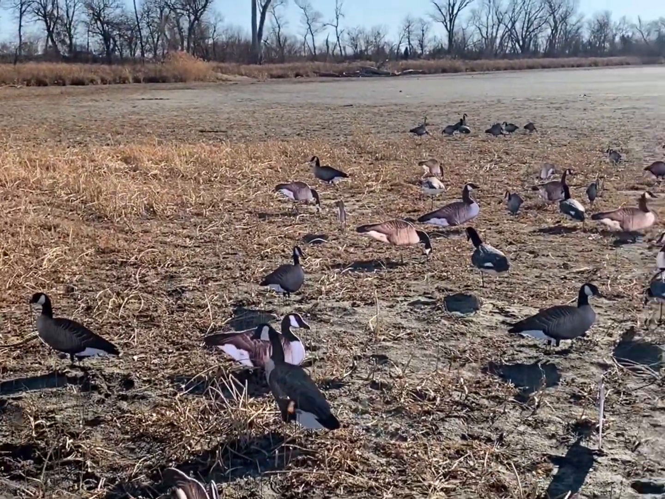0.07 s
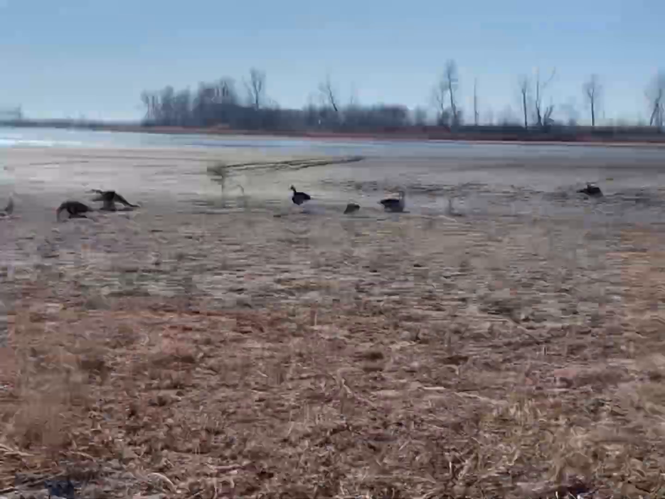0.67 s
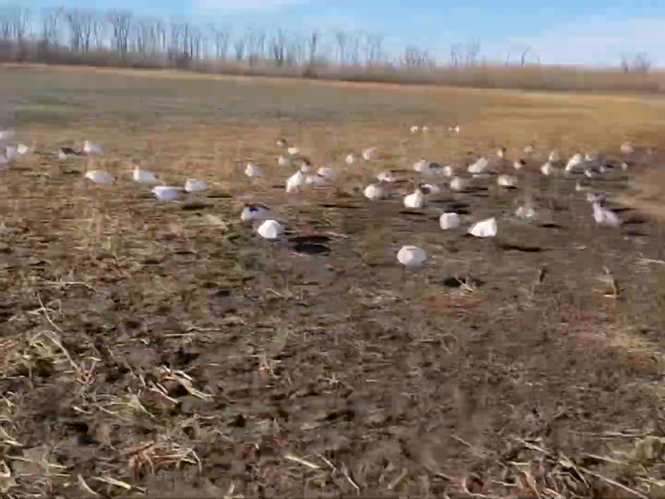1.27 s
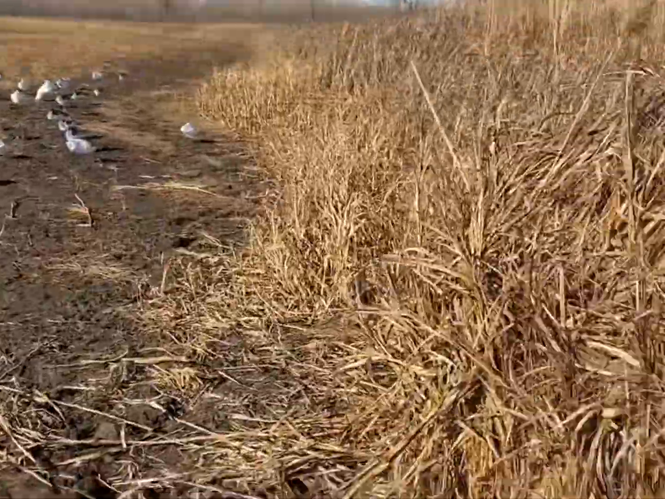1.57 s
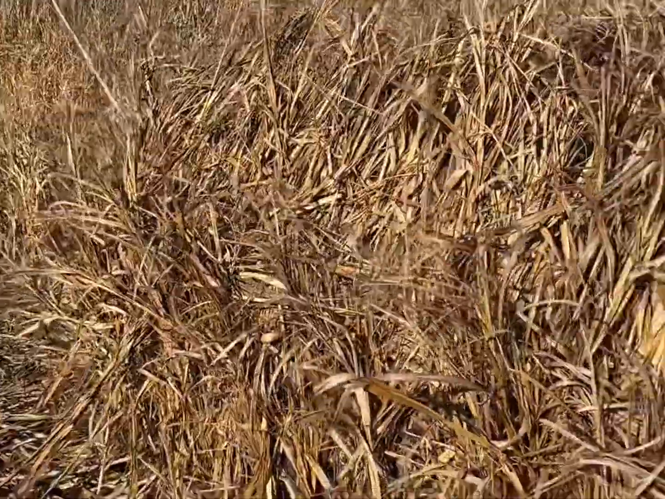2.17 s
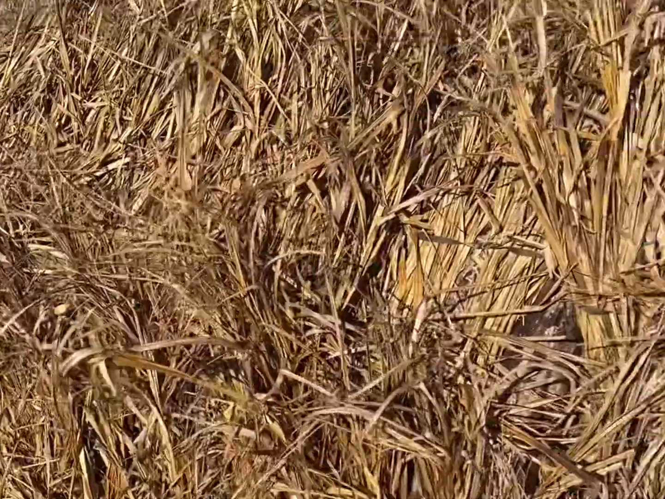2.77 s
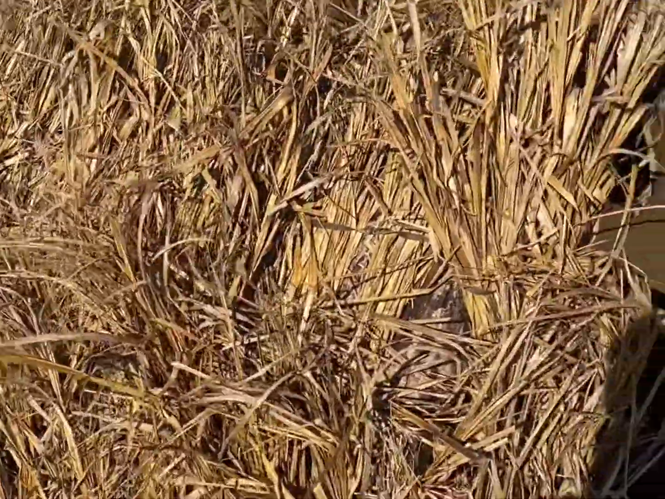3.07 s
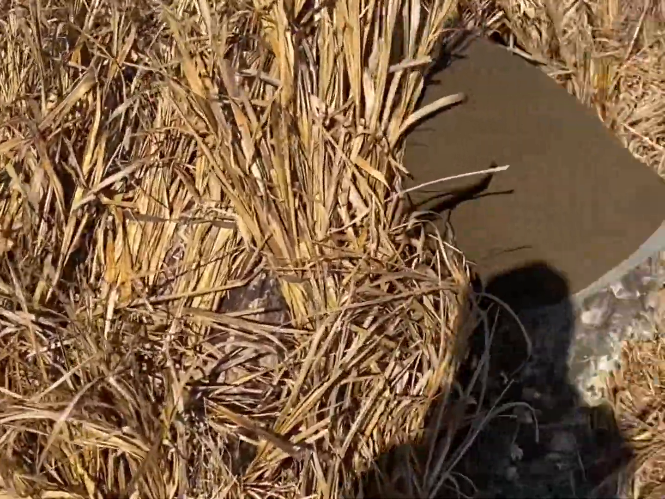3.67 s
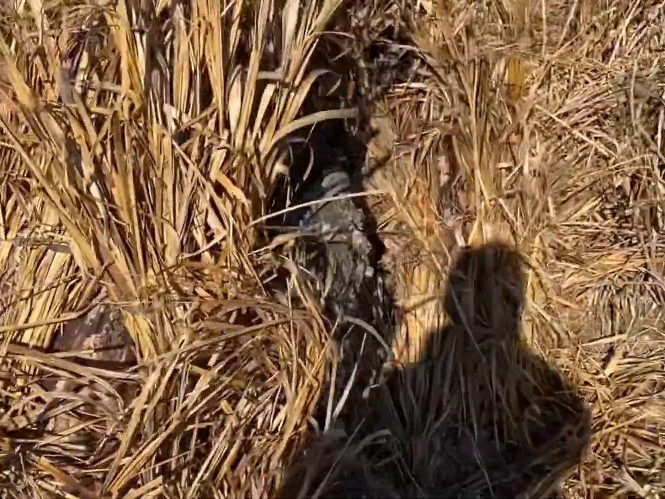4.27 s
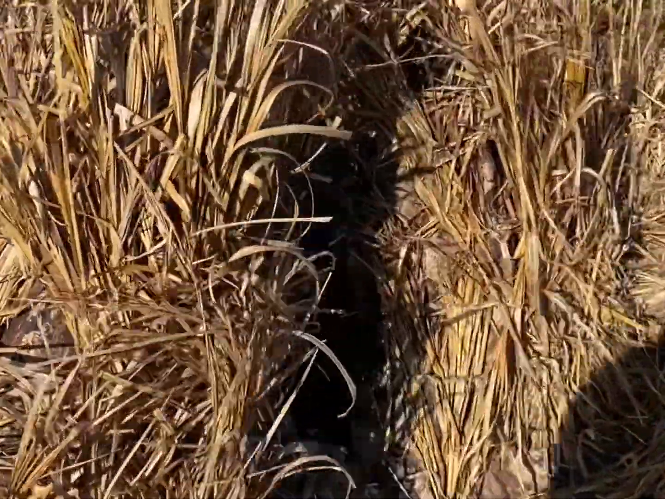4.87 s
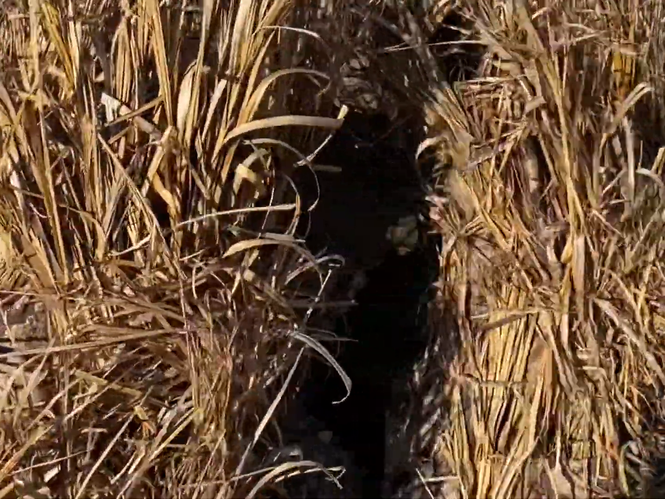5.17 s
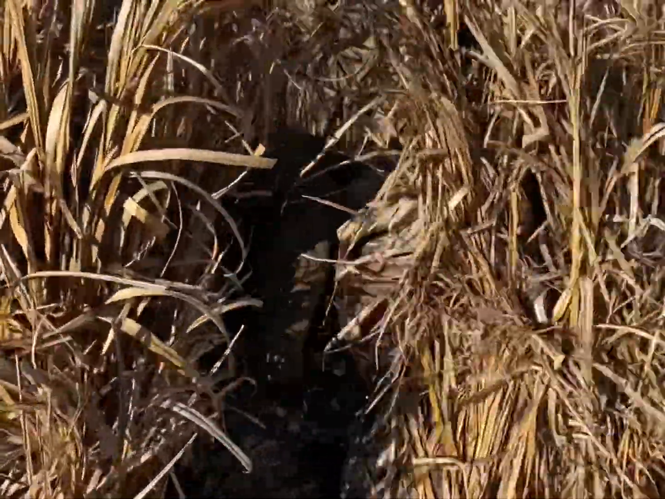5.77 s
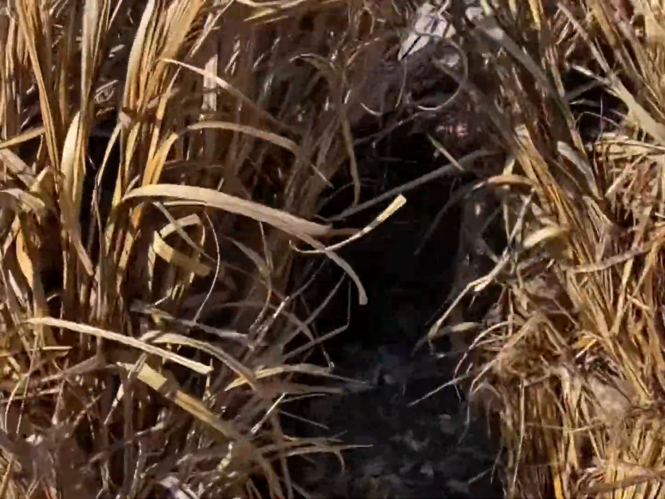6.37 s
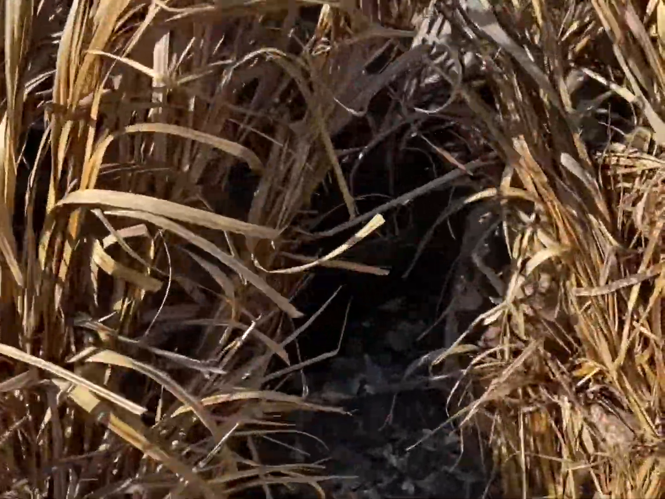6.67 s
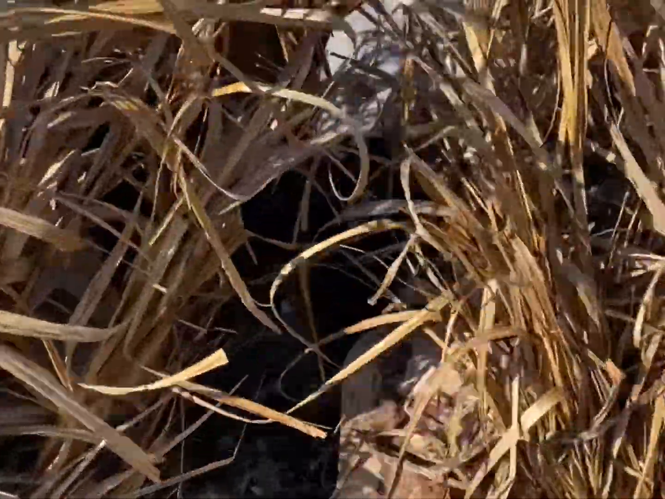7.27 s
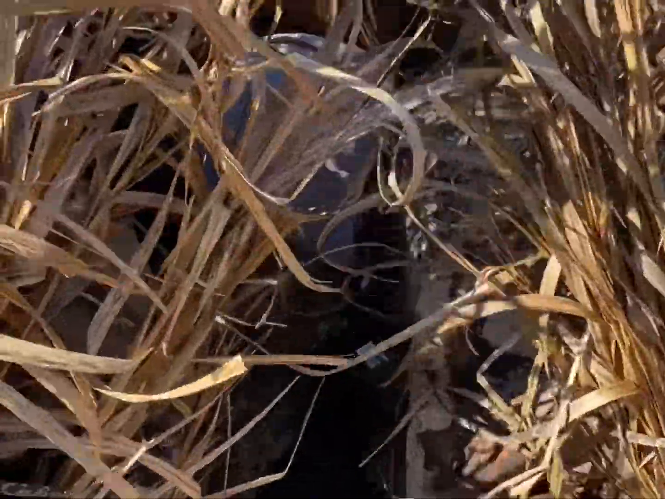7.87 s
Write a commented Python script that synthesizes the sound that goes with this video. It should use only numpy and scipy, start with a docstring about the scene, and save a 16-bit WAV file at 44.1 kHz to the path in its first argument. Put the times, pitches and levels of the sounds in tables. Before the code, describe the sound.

Gusts buffet a hand-held microphone outdoors with an uneven rumble and short, dull thumps. A crisp rustle of dry reeds builds close by, with brushing swishes, occasional snapping stalks and crunches of dead litter. The rustling is strongest a little past the middle, then both wind and reeds settle somewhat, with a soft footfall and light crackling near the end.

```python
"""Low, lumpy wind rumble on a hand-held microphone, carried from open marsh into dry reeds.
Gusts swell and flutter; hard eddies slap the microphone ports and fall into thumps.
The rustle grows as blades tick together and hollow stalks rub. Stalks snap, one woody tap
sounds early on, litter crunches and thuds underfoot. Behind it all, a faint, dull rush."""
import sys
import numpy as np
from scipy import signal
from scipy.fft import rfft, irfft, next_fast_len
from scipy.io import wavfile
from scipy.ndimage import uniform_filter1d

SR = 44100
rng = np.random.default_rng(int(sys.argv[2]) if len(sys.argv) > 2 else 0)


def generate_wav(sig):
    """Save sig (samples, or channels by samples) to the path in sys.argv[1] as 16-bit PCM at SR."""
    pcm = np.round(np.clip(np.atleast_2d(sig).T, -1, 1) * 32767).astype(np.int16)
    wavfile.write(sys.argv[1], SR, pcm)


N = 353241
TIME_S = np.arange(N) / SR
FFT_SIZE = next_fast_len(N + 8192)
FREQS_HZ = np.maximum(np.fft.rfftfreq(FFT_SIZE, 1 / SR), 1)
CUTOFF_HZ = 15900

# Table levels are relative; each source adds its own gain.
# light air between gusts: (time [s], rumble [dB])
BREEZE_CURVE = [(0, -39.5), (0.35, -53.5), (0.65, -45.5), (1.0, -48), (1.4, -59), (1.8, -38.5), (2.2, -58),
                (3.1, -39.5), (3.5, -41), (3.7, -48.5), (4.1, -45.5), (4.68, -37), (4.8, -46), (4.9, -38.5),
                (5.45, -42.5), (5.77, -53.5), (5.9, -46), (6.28, -59), (6.55, -48), (6.9, -50.5),
                (7.6, -54.5), (7.87, -46), (8.0, -60)]
# gusts at the microphone: (peak time [s], length [s], rumble [dB], flutter [dB])
GUST_EVENTS = [(0.154, 0.048, -38, -59), (0.237, 0.098, -40, -52), (0.49, 0.23, -38.5, -49.5),
               (0.831, 0.15, -32.5, -39), (1.068, 0.12, -33, -46), (1.258, 0.061, -37.5, -53.5),
               (1.507, 0.098, -39, -50), (1.648, 0.089, -31, -41.5), (1.805, 0.2, -32.5, -35.5),
               (1.985, 0.079, -30, -40), (2.114, 0.058, -38.5, -49.5), (2.333, 0.078, -28.5, -37),
               (2.45, 0.038, -34.5, -38), (2.623, 0.055, -34, -48.5), (2.87, 0.22, -32.5, -36),
               (3.277, 0.04, -39, -41), (3.378, 0.024, -24, -43), (3.918, 0.087, -33.5, -40.5),
               (4.307, 0.087, -33, -41), (4.495, 0.1, -35, -41), (4.578, 0.22, -37.5, -46.5),
               (4.743, 0.031, -33.5, -39), (5.086, 0.022, -22.5, -44), (5.176, 0.1, -32, -37),
               (5.484, 0.069, -38, -47), (5.582, 0.18, -42.5, -47.5), (5.896, 0.015, -36, -67.5),
               (5.97, 0.047, -35, -53), (6.103, 0.14, -42.5, -72), (6.47, 0.22, -40.5, -45.5),
               (6.728, 0.05, -35.5, -66), (7.103, 0.1, -44, -64)]
# single hard eddies: (time [s], slap [dB], thump [dB])
HARD_EDDIES = [(0.025, -21.5, -33), (0.128, -33.5, -30.5), (0.767, -24, -31), (0.809, -14, -27),
               (0.825, -13, -39), (0.837, -19, -41), (0.849, -15, -47), (0.863, -23.5, -29),
               (0.875, -18.5, -16), (0.885, -18, -26), (0.892, -11.5, -23), (0.904, -23, -21.5),
               (1.083, -24, -26.5), (1.516, -25, -23.5), (1.672, -23.5, -24.5), (1.735, -22.5, -36),
               (1.757, -21, -22), (1.799, -16.5, -20.5), (1.927, -25, -27), (1.956, -25, -43),
               (2.312, -15.5, -20), (2.426, -18, -38), (2.601, -23, -32), (2.773, -22, -17.5),
               (2.878, -16.5, -25.5), (2.89, -16.5, -30.5), (2.932, -18, -26), (2.99, -11, -46),
               (3.093, -23, -34), (3.255, -26, -36), (3.378, -20.5, -28.5), (3.561, -25.5, -29),
               (4.305, -26.5, -33), (4.556, -24, -23), (4.948, -23.5, -30.5), (5.069, -15, -19.5),
               (5.121, -18, -21), (5.177, -21, -29), (5.187, -10, -30), (5.562, -25.5, -40),
               (5.574, -22.5, -26), (6.436, -31, -34), (6.452, -31, -26.5), (6.49, -29.5, -34),
               (6.647, -35.5, -40)]
# steady stir of the reeds: (time [s], rustle [dB])
STIR_CURVE = [(0, -63.5), (0.35, -68.5), (0.6, -64.5), (1.15, -64.5), (1.7, -53), (1.95, -54),
              (2.25, -46.5), (2.6, -43.5), (3.15, -47.5), (3.8, -43), (4.3, -43.5), (4.7, -49),
              (5.15, -40.5), (5.7, -43.5), (5.9, -46), (6.5, -52.5), (6.62, -56), (6.74, -53), (7.1, -50),
              (8.0, -49.5)]
# brushed clumps: (start [s], peak [dB], rise [s], t60 [s])
CLUMP_SWISHES = [(1.49, -48, 0.097, 0.48), (1.991, -38.5, .12, 0.54), (2.229, -40, 0.029, 0.32),
                 (2.7, -41, 0.068, 0.81), (3.88, -42, 0.046, 1), (4.21, -43.5, 0.076, 0.32),
                 (4.762, -42.5, 0.026, 1.4), (5.209, -36, 0.023, 1.25), (5.327, -37.5, 0.049, 2.1),
                 (5.495, -39.5, 0.042, 0.11), (5.968, -41, 0.044, 1.4), (6.744, -41.5, 0.099, 3.1),
                 (7.32, -47.5, 0.085, 1.06), (7.6, -45, 0.091, 0.88)]
# dull low body of the rustle relative to the stalks, briefly ducked by the recorder's
# wind reduction: (time [s], level [dB])
LOW_RUSTLE_CURVE = [(0.5, -7), (1.2, 9), (1.6, -2.5), (2.2, 2), (5.3, 2), (6.3, -2), (6.68, -7.5), (7.3, 2)]
# breaking stalks: (time [s], level [dB], pitch [Hz])
STALK_SNAPS = [(0.221, -55, 5000), (0.401, -45.5, 6000), (0.526, -53, 8000), (0.6728, -53, 8000),
               (0.976, -47, 10000), (1, -48, 9000), (1.017, -49, 9000), (1.729, -45, 8000),
               (1.755, -43, 9000), (2.255, -36, 6000), (3.13, -34, 6000), (3.482, -36, 11000),
               (3.93, -29.5, 9000), (4.231, -32, 9000), (5.5086, -30, 10000), (5.518, -31, 7500),
               (6.5157, -41, 12700), (7.9667, -41.5, 11000)]
# crushed litter, scraped stalks: (time [s], level [dB], pitch [Hz], t60 [s], low edge [Hz])
LITTER_CRUNCHES = [(0.897, -42.5, 2400, 0.28, 655), (3.601, -41, 960, 0.13, 600),
                   (3.882, -32, 9500, 0.041, 3020), (4.011, -33, 9500, 0.13, 1810),
                   (5.309, -34, 2200, 0.11, 910), (5.341, -23.5, 2200, 0.016, 905),
                   (5.3827, -33.5, 2200, 0.032, 700), (5.539, -35, 2340, 0.039, 1510),
                   (6.821, -44.5, 1100, 0.089, 450), (6.885, -55, 2050, .3, 1610),
                   (6.931, -38, 2700, 0.09, 1620), (6.949, -32.5, 2270, 0.023, 1650),
                   (7.102, -42.5, 1490, 0.054, 600)]
# steps on matted reeds: (time [s], level [dB])
SOFT_STEPS = [(3.595, -50), (6.814, -43.5)]
# wind spectra: (frequency [Hz], level [dB])
RUMBLE_SPECTRUM = [(22, -19), (34, -16.5), (50, -1), (75, 1.5), (110, -5), (170, -11), (260, -17),
                   (420, -43)]
FLUTTER_SPECTRUM = [(130, -15), (220, 4.5), (320, 6), (480, 0), (700, -10), (900, -41.5), (1400, -45)]
SPIT_SPECTRUM = [(230, -11.5), (420, 17.5), (700, 1.5), (1100, -17.5), (1500, -17.5), (2200, -46)]
# reed spectra: (frequency [Hz], level [dB])
BLADE_SPECTRUM = [(2000, -40), (3200, -12.5), (4300, -7), (5000, -2), (6500, -4), (9000, -1), (10200, -6),
                  (12500, -5), (14500, -6.5), (18000, -17)]
STALK_SPECTRUM = [(1100, -10.5), (1500, -3), (1900, 0), (2400, 2), (3000, -3), (4200, -4), (6000, -25)]
LOW_RUSTLE_SPECTRUM = [(220, -7), (550, 1), (1000, 1.5), (1400, -3), (2000, -22)]
SNAP_SPECTRUM = [(600, -15), (2000, 3.5), (9000, 11.5), (18000, 3)]
# left port ahead of the right: (frequency [Hz], phase [rad])
LEFT_PHASE_LEAD = [(0, 0.1), (780, -0.1), (1210, 0.97), (1720, 0.5), (2240, 0.75), (3530, 0.4),
                   (4130, 0.75), (5080, -0.1), (6370, 1.85), (6980, 2.92), (8300, 3.8), (9470, 5.3),
                   (9800, 6.1), (10900, 6.3), (11800, 7.4), (13000, 9), (14400, 9.2), (15600, 12.1)]
# diffuse sound at the ports: (frequency [Hz], share [0-1])
DIFFUSE_SHARE = [(500, 0.0067), (1000, 0.31), (1800, 0.12), (3000, 0.35), (4700, 0.11), (6000, 0.006),
                 (7300, 0.00047), (9000, 0.033), (10400, 0.038), (12000, 0.13), (13500, 0.034),
                 (15500, 0.19)]


def wind(rumble_gain_db=3.5, flutter_gain_db=2.0, spit_gain_db=-23.0, rough_above_db=-50.5):
    """Lumpy turbulence: light air flutters smoothly, stronger flow breaks into brighter puffs."""
    rumble_db, flutter_db = airflow_db()
    lumps = from_db(4.5 * drift(40.0))
    eddies = grains(150, spread_db=4.5)[0]
    puffs = rms_one(lumps * (eddies + 0.4 * rng.standard_normal(N)))
    roughness = 1 / (1 + from_db(2 * (rough_above_db - flutter_db)))
    force = from_db(0.5 * (flutter_db - flutter_db.max()))
    rumble = colour(puffs + lumps * rng.standard_normal(N), RUMBLE_SPECTRUM)
    smooth_flow = 0.27 * (1 - roughness) * rng.standard_normal(N)
    flutter = colour(roughness * puffs + smooth_flow, FLUTTER_SPECTRUM)
    spit = from_db(spit_gain_db) * force * colour(puffs * rng.standard_normal(N), SPIT_SPECTRUM)
    return (from_db(rumble_db + rumble_gain_db) * steady(swoop(rumble), span_s=0.067)
            + from_db(flutter_db + flutter_gain_db) * steady(swoop(flutter + spit), span_s=0.11))


def airflow_db(typical_breeze_db=-46.5, typical_flutter_db=-54, flutter_lead_s=0.011):
    """Rumble and flutter levels: gusts on a wavering breeze, small eddies just ahead."""
    breeze_db = curve(BREEZE_CURVE) + 3 * drift(18)
    rumbles_db = [breeze_db]
    flutters_db = [typical_flutter_db + 0.39 * (breeze_db - typical_breeze_db)]
    for peak_s, length_s, rumble_db, flutter_db in GUST_EVENTS:
        rumbles_db.append(rumble_db + gust_db(peak_s, length_s))
        flutters_db.append(flutter_db + gust_db(peak_s - flutter_lead_s, length_s))
    return power_sum_db(rumbles_db), power_sum_db(flutters_db)


def gust_db(peak_s, length_s, rise_speedup=1.29):
    """Bell-shaped swell: builds faster than it dies, 6 dB down half a length after the peak."""
    offset = (TIME_S - peak_s) / (length_s / 2) * np.where(TIME_S < peak_s, rise_speedup, 1)
    return -6 * np.minimum(offset ** 2, 20)


def buffets(slap_gain_db=-7.0, thump_gain_db=0.5, spit_gain_db=-17.5,
            thump_hz=80, max_sweep_hz=880, glide_s=0.00597, port_band_hz=(33, 2200)):
    """An eddy slaps the port, brighter when harder; the pressure swing slows into a thump."""
    out, spit_envelope = np.zeros(N), np.zeros(N)
    wobble = from_db(2 * drift(320.0))
    ragged = rms_one(from_db(3 * drift(194)))
    hardest_db = max(slap_db for _, slap_db, _ in HARD_EDDIES)
    for start_s, slap_db, thump_db in HARD_EDDIES:
        span = half_second(start_s)
        force = from_db(0.805 * (slap_db - hardest_db))
        hz = thump_hz + max_sweep_hz * np.sqrt(force) * np.exp(-(TIME_S[span] - start_s) / glide_s)
        swing = np.sin(2 * np.pi * (np.cumsum(hz * wobble[span]) / SR + rng.random()))
        slap = from_db(slap_db + slap_gain_db) * burst(start_s, rise_s=0.0035, t60_s=0.018)
        thump = from_db(thump_db + thump_gain_db) * burst(start_s + 0.0025, rise_s=0.059, t60_s=0.063)
        out[span] += swing * ragged[span] * (slap + thump)[span]
        spit_gain = from_db(slap_db + spit_gain_db) * force
        spit_envelope += spit_gain * burst(start_s, rise_s=0.0023, t60_s=0.055)
    out += spit_envelope * steady(colour(rng.standard_normal(N), SPIT_SPECTRUM), span_s=0.033)
    return bandpass(out, port_band_hz, order=3)


def reeds(blade_gain_db=0.33, stalk_gain_db=-1.36, low_gain_db=-5.0,
          blade_tick_db=-6.5, stalk_tick_db=-7.5):
    """Blades tick in bunches, faster when stirred; hollow stalks rub lower, over a dull low body."""
    blade_db, stalk_db = reed_motion_db()
    contacts_per_s = 10000 * from_db(0.5 * (blade_db - blade_db.max()))
    clumps = from_db(1.5 * drift(35.0))
    blade_friction = rms_one(grains(contacts_per_s, spread_db=-2.5) / np.sqrt(contacts_per_s))
    blade_friction += rng.standard_normal((2, N))
    stalk_friction = rms_one(grains(contacts_per_s / 2, spread_db=0) / np.sqrt(contacts_per_s))
    stalk_friction += rng.standard_normal((2, N))
    ticks_per_s = contacts_per_s / 20
    bunched_per_s = ticks_per_s * from_db(6.5 * drift(20))
    blade_ticks = ticks(bunched_per_s, band_hz=(3350, 14200), t60_cycles=2.2, spread_db=2.8)
    stalk_ticks = ticks(ticks_per_s, band_hz=(1295, 2790), t60_cycles=40, spread_db=2.0)
    blades = rms_one(colour(blade_friction * clumps, BLADE_SPECTRUM))
    blades += from_db(blade_tick_db) * blade_ticks
    stalks = rms_one(colour(stalk_friction * clumps, STALK_SPECTRUM))
    stalks += from_db(stalk_tick_db) * stalk_ticks
    low_rustle = rms_one(colour(stalk_friction[::-1] * clumps, LOW_RUSTLE_SPECTRUM))
    return (from_db(blade_db + blade_gain_db) * blades
            + from_db(stalk_db + stalk_gain_db) * stalks
            + from_db(stalk_db + curve(LOW_RUSTLE_CURVE) + low_gain_db) * low_rustle)


def reed_motion_db(typical_blade_db=-44.5, typical_stalk_db=-49.5):
    """Blade and stalk levels: swishes build and settle over the stir; stalks follow the blades."""
    levels_db = [curve(STIR_CURVE)]
    for start_s, peak_db, rise_s, t60_s in CLUMP_SWISHES:
        build_db = 20 * np.log10(np.clip((TIME_S - start_s) / rise_s, 1e-4, 1))
        settle_db = -60 * np.clip((TIME_S - start_s - rise_s) / t60_s, 0, 2)
        levels_db.append(peak_db + build_db + settle_db)
    blade_db = power_sum_db(levels_db)
    return blade_db, typical_stalk_db + 0.95 * (blade_db - typical_blade_db)


def ticks(rate_per_s, band_hz, t60_cycles, spread_db):
    """Each stiff blade or stalk rings briefly at one of 16 pitches."""
    hits, out = grains(rate_per_s, spread_db), 0
    pitches_hz = np.geomspace(*band_hz, 16)
    pitch_index = rng.integers(0, len(pitches_hz), N)
    for k, hz in enumerate(pitches_hz):
        radius = from_db(-60 * hz / (t60_cycles * SR))
        feedback = [1, -2 * radius * np.cos(2 * np.pi * hz / SR), radius * radius]
        out += np.sqrt(hz) * signal.lfilter([1, 0, -1], feedback, hits * (pitch_index == k) + 1e-18)
    return rms_one(out)


def snaps(crack_db=-1.5, shiver_db=-7.5, ring_db=-2.5):
    """A stalk cracks, higher the thinner it is; its leaves shiver briefly."""
    fibres, body, rings = rng.standard_normal((2, N)), 0, 0
    for start_s, level_db, pitch_hz in STALK_SNAPS:
        crack = from_db(level_db) * burst(start_s, rise_s=0.0002, t60_s=0.007) * fibres
        shiver = from_db(level_db + shiver_db) * burst(start_s, rise_s=0.00093, t60_s=0.067) * fibres
        body += from_db(crack_db) * crack + shiver
        rings += resonate(crack, pitch_hz, q=3.5)
    return colour(body, SNAP_SPECTRUM) + from_db(ring_db) * rings


def crunches(body_db=-2.0, ring_db=-7.0):
    """Litter gives way in a run of small breaks that ring a stalk; thick stems reach lower."""
    breaks = steady(grains(5000, spread_db=3.0), span_s=0.01)
    out = np.zeros((2, N))
    for start_s, level_db, pitch_hz, t60_s, low_hz in LITTER_CRUNCHES:
        span = half_second(start_s)
        run = from_db(level_db) * burst(start_s, t60_s / 50, t60_s)[span] * breaks[:, span]
        top_hz = np.clip(1.046 * pitch_hz, low_hz + 100, CUTOFF_HZ)
        makeup_gain = np.sqrt(SR / 2 / (top_hz - low_hz))
        body = makeup_gain * bandpass(run + 1e-18, [low_hz, top_hz], order=2)
        out[:, span] += from_db(body_db) * body + from_db(ring_db) * resonate(run, pitch_hz, q=7.3)
    return out


def knock(start_s=0.4015, level_db=-34.0, pitch_hz=880, click_db=-5.0):
    """One hard, woody tap with a bright click on its front."""
    tone = np.sin(2 * np.pi * pitch_hz * (TIME_S - start_s))
    ring = tone * burst(start_s, rise_s=0.00014, t60_s=0.0086)
    click = burst(start_s, rise_s=0.0002, t60_s=0.0067) * rng.standard_normal((2, N))
    return from_db(level_db) * (ring + from_db(click_db) * click)


def footfalls():
    """A step presses matted reeds down with a soft, hollow thud."""
    press = sum(from_db(level_db) * burst(start_s, rise_s=0.013, t60_s=0.2)
                for start_s, level_db in SOFT_STEPS)
    return press * resonate(rng.standard_normal(N), hz=330, q=10.0)


def far_wind(level_db=-67.0, swell_db=-0.5):
    """Faint, dull rush of the open marsh, from all around."""
    spectrum_hz_db = [(400, -36), (650, 13), (1000, 2), (2500, -8)]
    rush = colour(rng.standard_normal((2, N)), spectrum_hz_db)
    return from_db(level_db + swell_db * drift(4.8)) * rush


def microphone_ports(pair):
    """Direct sound reaches the left port early; diffuse sound differs between the ports."""
    direct, diffuse = rfft(pair, FFT_SIZE)
    side_share = np.clip(over_hz(DIFFUSE_SHARE), 0, 1) / 2
    polarity = np.array([[1], [-1]])
    stereo = np.sqrt(1 - side_share) * direct + polarity * np.sqrt(side_share) * diffuse
    stereo[0] *= np.exp(1j * over_hz(LEFT_PHASE_LEAD))
    return irfft(stereo, FFT_SIZE)[:, :N]


def from_db(db):
    """Decibels to gain."""
    return 10 ** (np.asarray(db) / 20)


def power_sum_db(levels_db):
    """Joint level of unrelated sounds."""
    return 10 * np.log10(sum(from_db(db) ** 2 for db in levels_db) + 1e-20)


def rms_one(x):
    """Scale to unit power."""
    return x / np.sqrt(np.mean(x ** 2) + 1e-20)


def curve(points):
    """(time, value) points at every sample."""
    return np.interp(TIME_S, *np.transpose(points))


def over_hz(points):
    """(frequency, value) points at every bin, joined on a log axis."""
    hz, value = np.transpose(points)
    return np.interp(np.log(FREQS_HZ), np.log(hz), value)


def half_second(start_s):
    """Sample slice of one event."""
    return slice(int(start_s * SR), int(start_s * SR) + SR // 2)


def burst(start_s, rise_s, t60_s):
    """Envelope: quick rise, exponential fall, peak 1."""
    out, span = np.zeros(N), half_second(start_s)
    age_s = np.arange(len(out[span])) / SR
    shape = (1 - np.exp(-age_s / rise_s)) * from_db(-60 * age_s / t60_s)
    out[span] = shape / (shape.max() + 1e-12)
    return out


def drift(rate_hz, hop=40):
    """Smooth random wander, RMS 1."""
    pole = np.exp(-2 * np.pi * rate_hz * hop / SR)
    noise = rng.standard_normal(N // hop + 2002)
    slow = signal.lfilter([1], [1, -2 * pole, pole * pole], noise)[2000:]
    return np.interp(np.arange(N) / hop, np.arange(len(slow)), rms_one(slow))


def grains(rate_per_s, spread_db):
    """Two unrelated click trains; positive spread makes a few clicks stand out."""
    sizes = from_db(spread_db * np.minimum(rng.exponential(1, (2, N)), 5))
    signs = rng.choice([-1, 1], (2, N))
    return rms_one(sizes * signs * (rng.random((2, N)) < rate_per_s / SR))


def steady(x, span_s):
    """Even out the power over the span; keep faster detail."""
    size = max(int(span_s * SR / 2), 2)
    power = uniform_filter1d(uniform_filter1d(x ** 2, size), size)
    return x / np.sqrt(np.abs(power) + 1e-12)


def colour(x, spectrum):
    """Minimum-phase filter with steep skirts; white noise keeps its power."""
    low_skirt = np.minimum(FREQS_HZ / spectrum[0][0], 1) ** 2
    high_skirt = np.minimum(spectrum[-1][0] / FREQS_HZ, 1) ** 4
    gain = rms_one(from_db(over_hz(spectrum)) * low_skirt * high_skirt)
    cepstrum = irfft(np.log(gain + 1e-5), FFT_SIZE)
    cepstrum[1:FFT_SIZE // 2] *= 2
    cepstrum[FFT_SIZE // 2 + 1:] = 0
    return irfft(rfft(x, FFT_SIZE) * np.exp(rfft(cepstrum)), FFT_SIZE)[..., :N]


def swoop(x, delay_cycles=0.499):
    """Lows arrive late, so each pulse falls in pitch."""
    lag_rad = 2 * np.pi * delay_cycles * np.log(FREQS_HZ + 20)
    return irfft(rfft(x, FFT_SIZE) * np.exp(-1j * lag_rad), FFT_SIZE)[:N]


def bandpass(x, band_hz, order):
    """Flat-topped band filter."""
    return signal.sosfilt(signal.butter(order, band_hz, "band", fs=SR, output="sos"), x)


def resonate(x, hz, q):
    """One resonance; white noise keeps its power."""
    return signal.lfilter(*signal.iirpeak(hz, q, fs=SR), x + 1e-18) * np.sqrt(q * SR / (np.pi * hz))


def scene():
    """Plants sound through the air; gusts press on both channels alike."""
    plants = microphone_ports(reeds() + snaps() + crunches() + knock())
    return plants + footfalls() + far_wind() + wind() + buffets()


def record(dry):
    """Steep treble cutoff."""
    return signal.sosfiltfilt(signal.ellip(10, 0.05, 60, CUTOFF_HZ, fs=SR, output="sos"), dry)


dry = scene()
out = record(dry)
generate_wav(out)
```